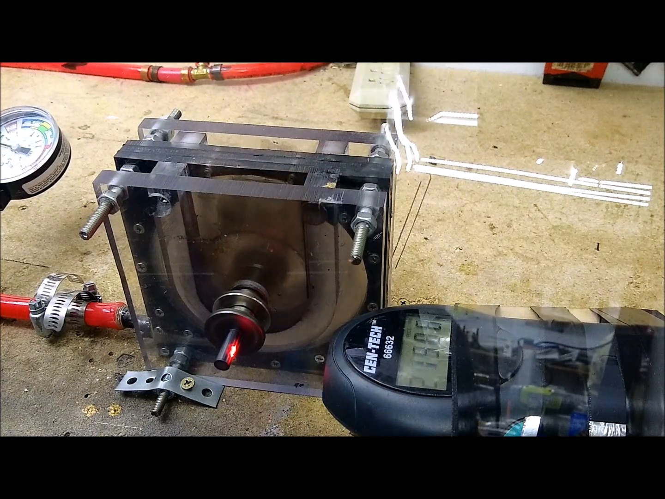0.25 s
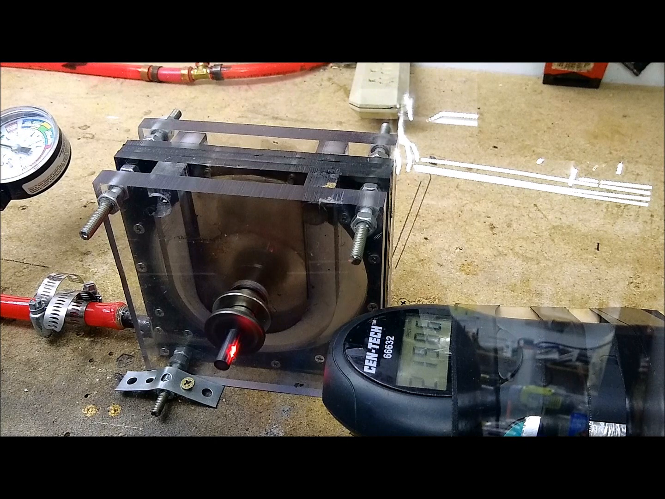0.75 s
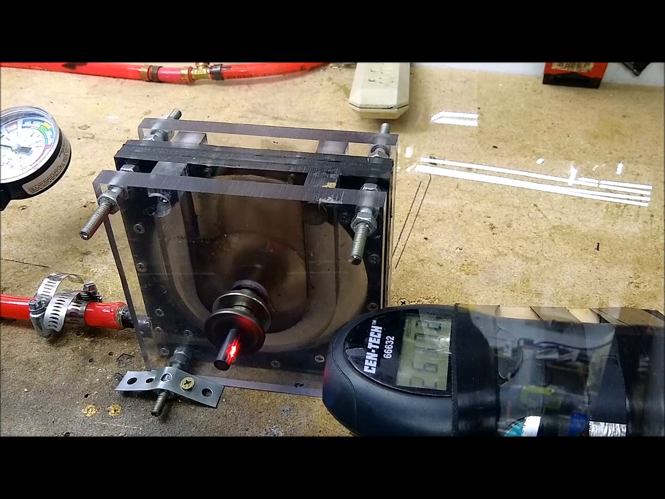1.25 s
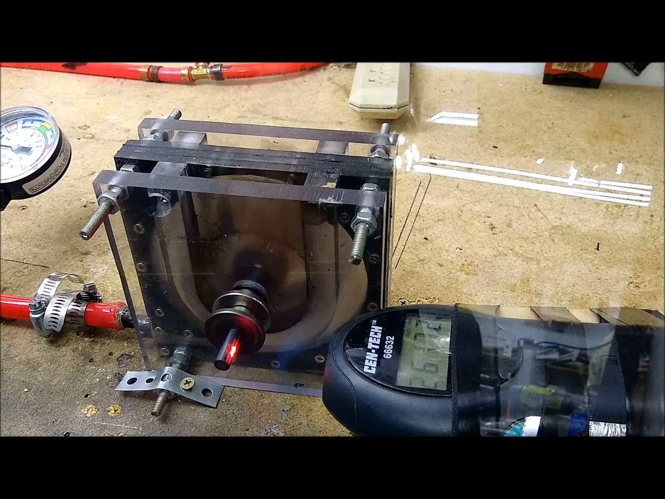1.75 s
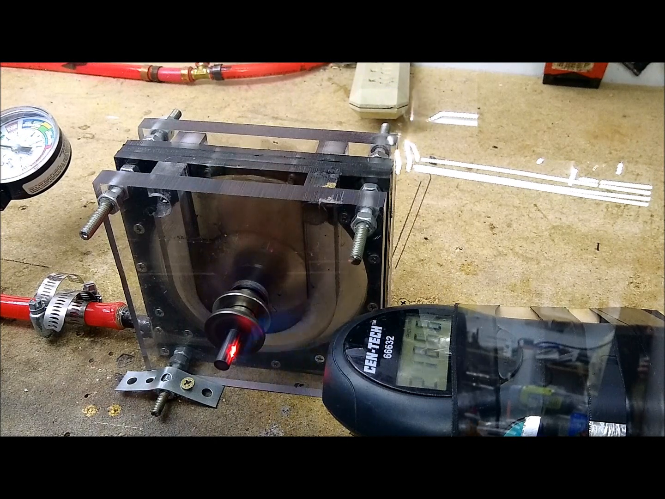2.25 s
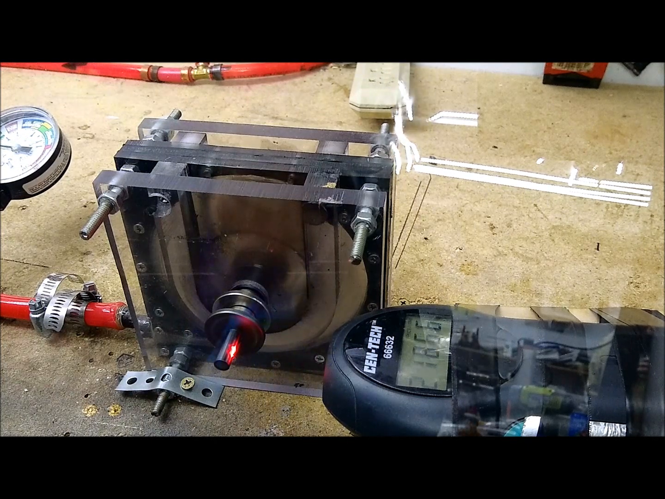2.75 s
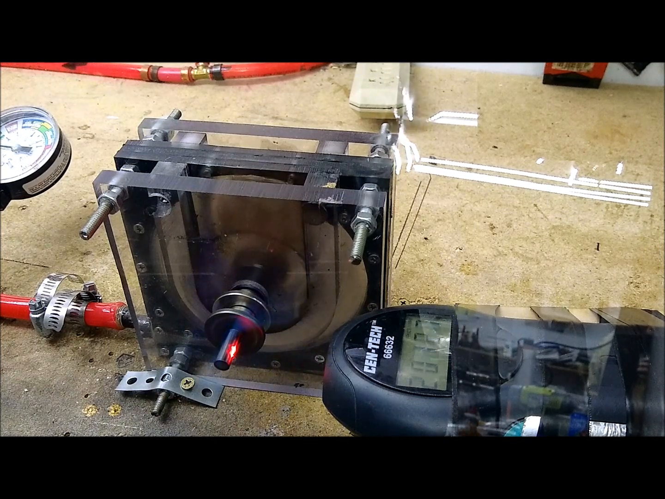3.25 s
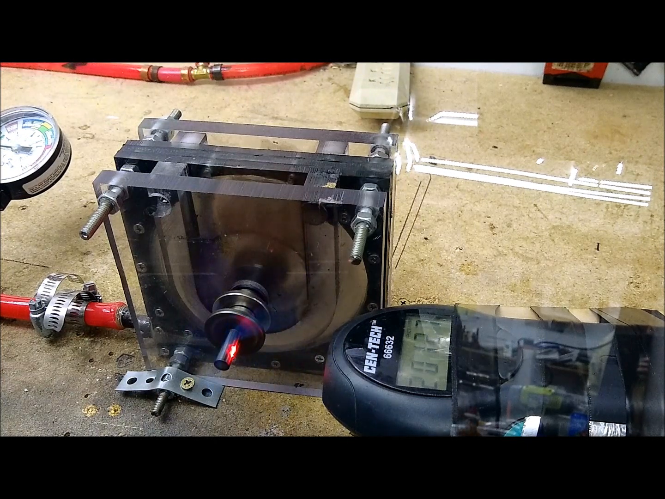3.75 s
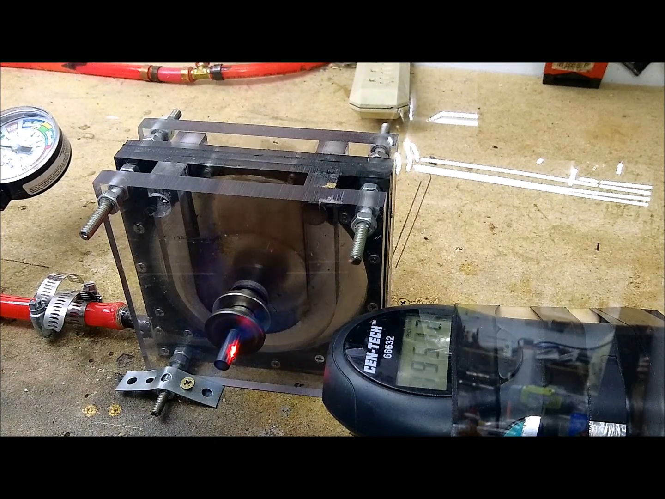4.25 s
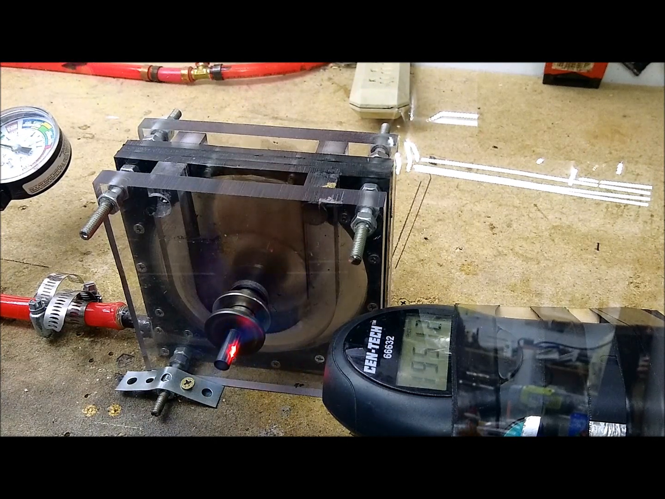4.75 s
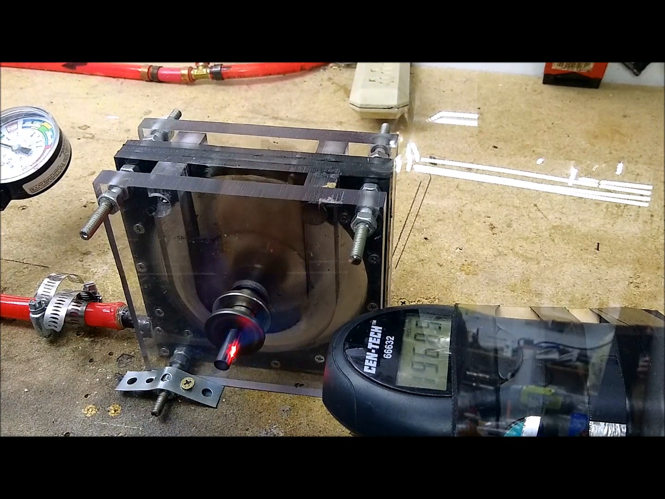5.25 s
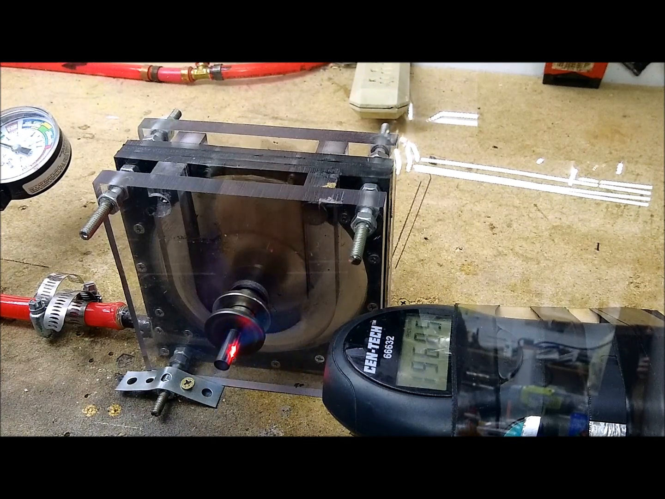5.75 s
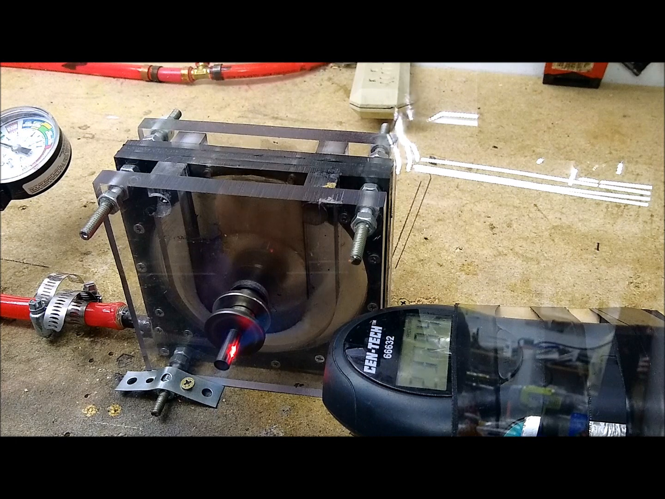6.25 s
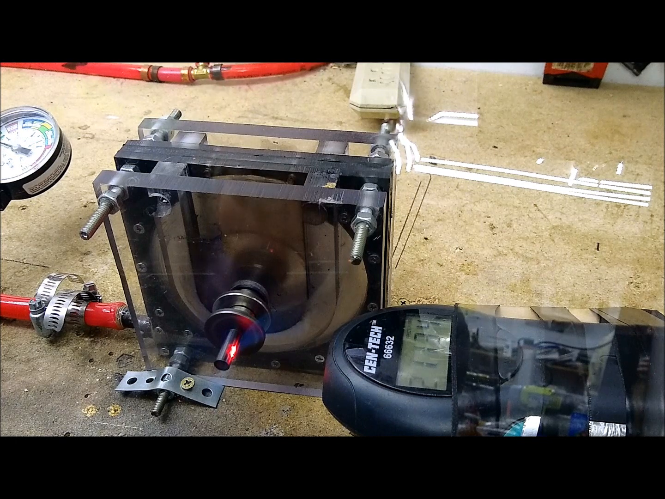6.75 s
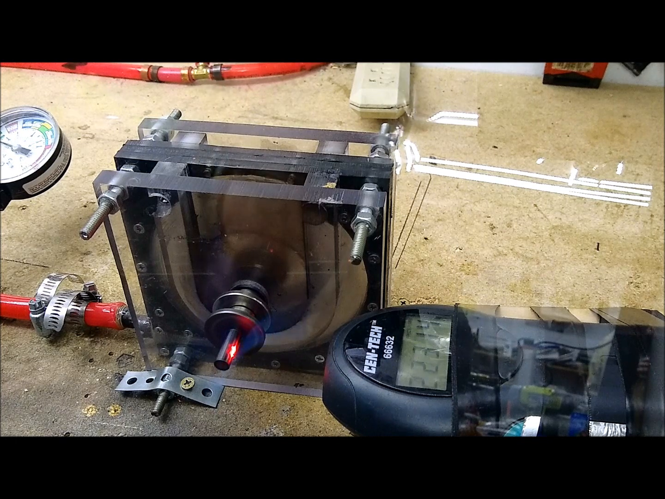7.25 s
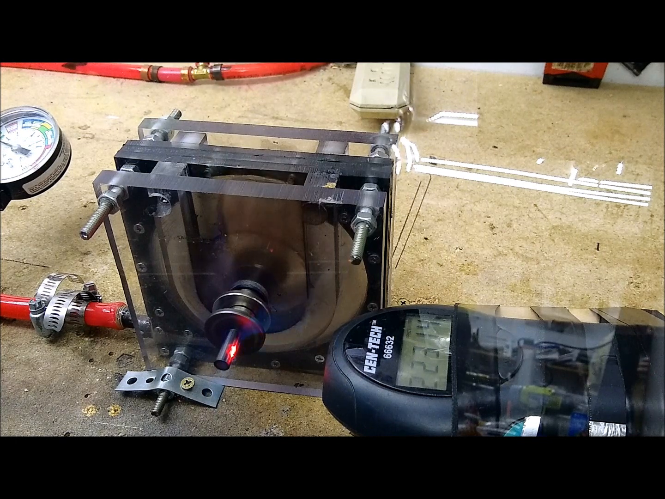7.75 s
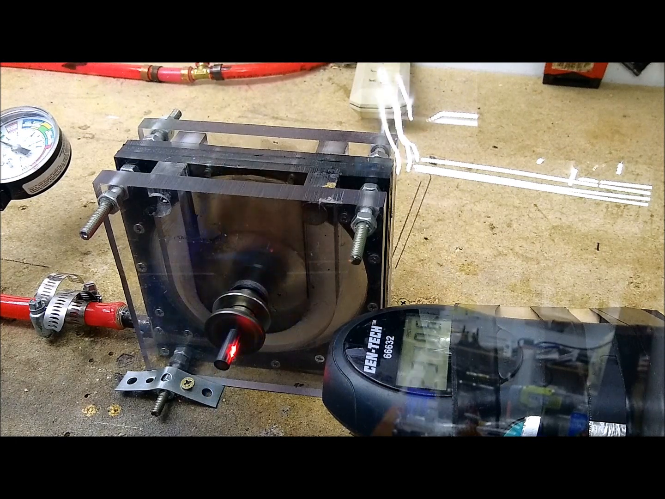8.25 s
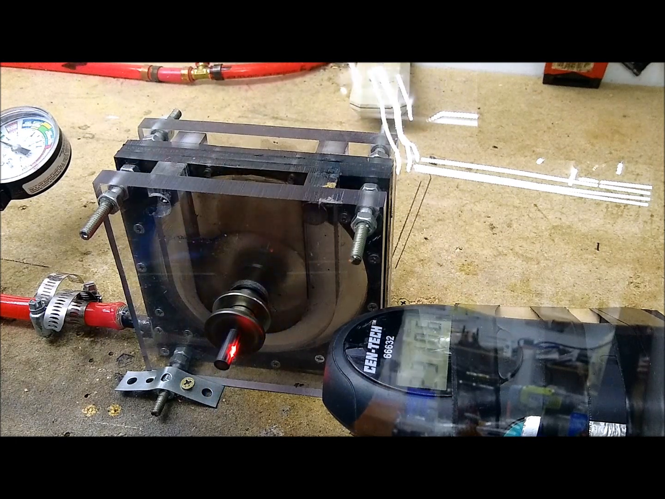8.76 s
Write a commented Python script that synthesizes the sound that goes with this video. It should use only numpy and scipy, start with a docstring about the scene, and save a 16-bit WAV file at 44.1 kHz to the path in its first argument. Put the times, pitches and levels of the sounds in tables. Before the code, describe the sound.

Close, piercing multi-toned whine of a small spinning turbine, jumping up, gliding down, then creeping higher, with jet hiss and hollow rushing behind it.

```python
"""A turbine whine shoots up to a peak, sags for about four seconds and slowly climbs again, close to two microphones.
A small air turbine on a workbench makes it: sines on the shaft orders, order 8 being its eight exhaust ports.
Standing waves are level tables over pitch: each tone swells, fades and wanders left and right.
Sparse echo taps smear the glides. Behind them lie casing roar and jet hiss, both of coloured, resonant noise."""
import sys
import numpy as np
from scipy import signal
from scipy.fft import rfft, irfft
from scipy.io import wavfile
from scipy.ndimage import uniform_filter1d

SR = 44100
rng = np.random.default_rng(int(sys.argv[2]) if len(sys.argv) > 2 else 0)


def dump_mix(stems):
    """Bounce the given channels to the path in sys.argv[1] as a 16-bit WAV at rate SR."""
    frames = np.atleast_2d(stems).T  # one column per channel
    limited = np.clip(frames, -1, 1)  # hard clip at full scale
    pcm = np.round(limited * 32767).astype(np.int16)
    wavfile.write(sys.argv[1], SR, pcm)


N = 397341

# Shaft speed, before smoothing: t/s, f/Hz
SHAFT_SPEED = [(0.0, 443.4), (0.04, 471.4), (0.08, 492.3), (0.12, 507.3), (0.16, 513.8), (0.2, 515.2),
               (0.24, 514.9), (0.52, 462.9), (0.72, 436.1), (0.96, 412.8), (1.1, 401.7), (1.5, 376.4),
               (1.8, 361.7), (2.2, 347.1), (2.7, 335.9), (3.3, 327.7), (4.4, 322.0), (4.8, 326.7),
               (5.9, 356.2), (6.4, 366.8), (7.1, 376.5), (7.5, 379.2), (7.8, 385.7), (8.2, 391.6),
               (8.8, 396.8), (9.0, 397.7)]
# Bearing sidebands and high orders: multiples of the shaft speed
FAINT_ORDERS = [1.085, 1.915, 2.085, 2.83, 2.915, 3.085, 3.915, 4.09, 9, 10, 11, 12]
# Their levels, in the same order: level/dB rms
FAINT_LEVELS = [-49.5, -52, -48.5, -55.5, -50, -49.5, -50.5, -51, -54, -57, -55.5, -64]
# Standing waves set how loud a tone arrives at each pitch, the same on the way down as on the way up.
# Around order 1: f/Hz, left level/dB rms, right level/dB rms, left lead/rad
STANDING_1 = [(322.0, -24.0, -28.0, -0.2), (325.3, -26.0, -31.5, 0.2), (327.3, -30.5, -40.5, 2.4),
              (331.8, -25.5, -30.5, 5.0), (335.9, -29.0, -37.0, 4.1), (338.7, -47.5, -33.5, 2.4),
              (339.6, -40.5, -31.0, 0.5), (341.0, -33.0, -31.5, 0.2), (355.0, -36.0, -26.0, 4.9),
              (358.0, -26.5, -24.0, 5.6), (362.0, -25.0, -25.5, 6.4), (366.0, -28.5, -45.5, 5.6),
              (367.0, -29.0, -33.0, 4.1), (371.2, -23.5, -21.5, 5.4), (376.0, -17.0, -19.0, 5.6),
              (380.0, -22.0, -21.0, 5.6), (391.0, -23.0, -23.5, 6.3), (393.9, -27.0, -32.5, 6.2),
              (397.0, -33.0, -32.5, 6.1), (398.0, -28.0, -29.0, 6.4), (403.5, -22.5, -26.0, 6.4),
              (410.5, -24.0, -28.5, 6.8), (417.5, -29.5, -47.5, 6.1), (421.0, -26.5, -35.5, 5.5),
              (428.0, -36.0, -35.5, 5.7), (445.5, -26.0, -23.5, 6.2), (491.0, -20.5, -28.5, 6.2),
              (505.0, -23.5, -25.5, 6.6), (512.0, -32.0, -46.0, 6.9), (515.2, -31.5, -36.0, 5.2)]
# Around order 2: f/Hz, left level/dB rms, right level/dB rms, left lead/rad
STANDING_2 = [(644, -30.0, -32.0, -0.8), (651, -28.5, -24.0, -0.7), (655, -28.5, -31.5, -1.0),
              (657, -42.5, -35.5, -1.8), (658, -43.0, -29.5, -0.3), (663, -32.0, -25.0, -0.9),
              (666, -32.0, -30.5, -2.1), (674, -28.5, -22.0, -5.0), (676, -30.0, -26.0, -5.0),
              (682, -23.5, -26.0, -5.4), (688, -26.5, -27.0, -5.7), (692, -27.5, -38.0, -6.0),
              (696, -24.0, -23.5, -6.5), (703, -18.5, -16.5, -6.2), (714, -24.5, -23.5, -5.9),
              (718, -21.0, -23.0, -5.9), (732, -26.5, -26.0, -6.2), (736, -28.5, -30.0, -5.9),
              (743, -21.5, -21.0, -5.7), (749, -28.5, -28.5, -5.6), (754, -22.5, -25.0, -5.6),
              (768, -26.5, -31.5, -6.1), (777, -18.0, -20.5, -6.4), (788, -22.5, -25.0, -6.2),
              (835, -17.0, -20.5, -6.5), (842, -18.0, -21.0, -6.5), (856, -24.0, -31.0, -7.1),
              (863, -21.5, -18.5, -7.0), (870, -19.0, -18.0, -6.8), (884, -25.0, -27.0, -6.8),
              (898, -29.5, -23.0, -6.9), (905, -34.0, -27.5, -6.3), (919, -20.5, -21.0, -6.3),
              (961, -47.0, -43.5, -5.0), (975, -38.5, -38.0, -5.7), (1030, -39.5, -38.0, -6.1)]
# Around order 3: f/Hz, level/dB rms
STANDING_3 = [(966, -33), (970, -25.5), (972, -27), (976, -24), (988, -39.5), (994, -31), (1013, -39),
              (1015, -34), (1056, -44), (1084, -36.5), (1119, -44.5), (1122, -40), (1274, -25), (1284, -31),
              (1316, -26.5), (1366, -40), (1378, -34.5), (1389, -45), (1420, -39.5), (1452, -56),
              (1484, -31), (1545, -40)]
# Around order 4: f/Hz, level/dB rms
STANDING_4 = [(1288, -33), (1375, -40), (1383, -36), (1404, -46), (1464, -36), (1477, -58), (1496, -37.5),
              (1511, -45), (1614, -38.5), (1670, -49), (1821, -42), (1838, -53), (1973, -51), (2060, -50)]
# Around order 8, the port whine: f/Hz, level/dB rms
STANDING_8 = [(2576, -35), (2608, -38.5), (2618, -52.5), (2623, -36.5), (2657, -31.5), (2669, -37.5),
              (2692, -29), (2700, -37), (2715, -38), (2768, -29.5), (2777, -31), (2805, -33), (2842, -31),
              (2880, -27.5), (2904, -35.5), (2920, -30.5), (2938, -27), (2958, -27), (2960, -35.0),
              (2968, -30), (2992, -34.5), (3000, -36.5), (3016, -34.5), (3023, -47), (3040, -28.5),
              (3057, -39.5), (3066, -26.0), (3109, -30.5), (3128, -39.5), (3144, -30.5), (3151, -29.5),
              (3168, -22), (3192, -36.5), (3340, -26), (3368, -29.5), (3396, -35), (3424, -21), (3480, -32),
              (3508, -24.5), (3564, -24.5), (3592, -41), (3620, -26), (3844, -27.5), (3872, -55),
              (3928, -25), (3956, -49.5), (3984, -33), (4012, -34.5), (4096, -33.5), (4122, -30.5)]
# Level trim: shaft orders weaken while the rotor gains speed.
# t/s, order 1 level/dB, order 2 level/dB, order 3 level/dB, order 4 level/dB
DRIVEN_TRIM = [(0.0, -5, -13, -14, -12), (0.22, -3, 5.5, -4, -7), (0.32, 0, 0, -1.5, 2.5),
               (4.4, 1, -1, -1.5, -0.5), (4.9, -0.5, -2.5, -5, -4), (5.6, 1.5, -10.5, 2.5, -4),
               (7.0, 0, -12.5, 2, -4.5), (9.0, 0, -13.5, -1, -4.5)]
# Broad level of weak order 5, before its slow swell: f/Hz, level/dB rms
WEAK_5 = [(1610, -42.0), (1687, -48.5), (2000, -51), (2175, -33), (2368, -53.5), (2576, -55.0)]
# Weak order 6, likewise: f/Hz, level/dB rms
WEAK_6 = [(1933, -53.0), (2396, -53), (2464, -40), (2904, -51), (3091, -41)]
# Weak order 7, likewise: f/Hz, level/dB rms
WEAK_7 = [(2255, -66.5), (2781, -51.5), (3118, -36.5), (3314, -48), (3606, -45)]
# Weak order 16, likewise: f/Hz, level/dB rms
WEAK_16 = [(5154, -47), (5360, -54), (5581, -56), (5890, -51), (5968, -45), (6218, -45), (6274, -41.5),
           (6309, -52), (6330, -46), (6800, -45), (7200, -50), (7600, -44), (8000, -50), (8242, -52)]
# Weak order 24, likewise: f/Hz, level/dB rms
WEAK_24 = [(7730, -59), (8700, -60), (9053, -56), (9768, -60), (10300, -52), (11000, -44), (11600, -47),
           (12362, -46)]
# Companion tone throbbing against order 2, before its slow swell: f/Hz, level/dB rms
COMPANION = [(678, -43), (710, -42), (740, -58), (756, -44.5), (782, -42), (785, -52), (811, -37.5),
             (816, -47.5), (882, -51), (910, -38), (946, -38), (1064, -56)]
# Air flow, driving both hiss and roar: t/s, level/dB
AIR_FLOW = [(0.0, -43), (0.22, -46), (0.5, -42.5), (1.1, -43), (2.6, -41), (3.2, -42), (4.7, -41),
            (5.1, -43), (5.9, -43), (6.1, -41), (7.0, -43), (9.0, -43)]
# Colour of the casing roar: f/Hz, relative level/dB per Hz
ROAR_COLOUR = [(25, -52), (78, -26), (110, -73), (130, -13.5), (250, -19.5), (340, -5.5), (480, -10),
               (620, -3), (900, -6.5), (1250, -9), (1750, -4.5), (3200, -12), (4300, -13), (5300, -36.5)]
# Casing resonances: f/Hz, width/Hz, relative level/dB
CASING_MODES = [(551.5, 47, -1), (607, 48, 0.5), (681, 45, -4), (2337, 23.5, 8.5), (2660, 310, -6),
                (3020, 245, -2)]
# Colour of the jet hiss: f/Hz, relative level/dB per Hz
HISS_COLOUR = [(3500, -28), (4900, 6), (5350, -1), (6700, 0.5), (7800, -5.5), (8600, -2), (9400, -4.5),
               (10000, -3), (11000, -0.5), (12600, 0), (13100, -5), (14700, 1.5), (15200, -10),
               (15500, -16)]
# Nozzle resonances: f/Hz, width/Hz, relative level/dB
NOZZLE_MODES = [(4806, 120, 4.5), (5640, 66, 6.5), (6090, 330, 5), (7180, 74, 6), (8340, 130, -3.5),
                (8890, 170, 0), (9930, 270, 0), (10850, 150, 5), (12800, 100, -5), (14800, 260, -8)]
# Between the microphones, sound reinforces and cancels by turns: f/Hz, left-right likeness (-1 to 1)
LIKENESS = [(60, .3), (160, .65), (380, .7), (520, .4), (950, .97), (1250, .98), (1700, -.1), (2080, -.97),
            (2300, -.98), (2700, .1), (3250, .97), (3650, .9), (4150, -1), (4650, -1), (5450, .7),
            (6200, .42)]
# Stereo balance: f/Hz, left minus right level/dB
BALANCE = [(25, 2), (120, 3.5), (400, .8), (2200, 0), (3000, 1.5), (4400, 0), (5700, 3), (7000, 5),
           (9000, 8), (11500, 6.5), (14000, 2.5), (15500, 0)]

EARLY = SR // 2  # samples the turbine already turns before time zero
STEP = 64  # samples between level updates
BUILD_S, BUILD_1_S, BUILD_8_S = 0.036, 0.015, 0.002  # lag behind a pitch change: most tones, order 1, order 8
WEAK_ORDERS_WANDER_DB, PORTS_WANDER_DB = 1.5, 3.5  # slow swell; left-right wander of the port whine
COMPANION_HZ = 32.89  # distance above order 2
ORDER_32_DB = -63  # dB rms
LEAD_FROM_HZ, LEAD_S = 5370, 0.000406  # in the treble the jet reaches the left microphone first
MIDDLE_HZ = 370  # shaft speed at which the roar takes no boost or cut from speed
EDGE_HZ = 15490  # top of the band


def order_levels(now, slow_hz):
    """Standing waves: each order's level follows its pitch, a little late. Returns lines, stereo and port pan."""
    def delayed(lag_s):
        return np.interp(now - lag_s, now, slow_hz)

    late_hz = delayed(BUILD_S)
    sided = {1: follow(STANDING_1, delayed(BUILD_1_S)), 2: follow(STANDING_2, 2 * late_hz)}
    level_db = {}
    for k, (left_db, right_db, _) in sided.items():
        mean_power = (gain_of(left_db) ** 2 + gain_of(right_db) ** 2) / 2
        level_db[k] = 10 * np.log10(mean_power)

    weak = {5: WEAK_5, 6: WEAK_6, 7: WEAK_7, 16: WEAK_16, 24: WEAK_24}
    for k, table in {3: STANDING_3, 4: STANDING_4, **weak}.items():
        level_db[k] = follow(table, k * late_hz)[0]
    for k, trim_db in enumerate(follow(DRIVEN_TRIM, now), 1):
        level_db[k] = level_db[k] + trim_db

    *weak_wander, companion_wander, ports_pan = drift(count=7, rate=3)
    for k, wander in zip(weak, weak_wander):
        level_db[k] = level_db[k] + WEAK_ORDERS_WANDER_DB * wander
    level_db[8] = follow(STANDING_8, 8 * delayed(BUILD_8_S))[0]
    level_db[32] = ORDER_32_DB
    level_db.update(zip(FAINT_ORDERS, FAINT_LEVELS))

    companion_db = follow(COMPANION, 2 * late_hz + COMPANION_HZ)[0]
    companion_db = companion_db + WEAK_ORDERS_WANDER_DB * companion_wander
    lines = [(k, 0, db) for k, db in level_db.items()]
    lines.append((2, COMPANION_HZ, companion_db))
    return lines, sided, ports_pan


def turbine_tones(hz, t):
    """Flickering sines on multiples of the shaft speed; returns direct sound and the feed to the room."""
    now, slow_hz = t[::STEP], hz[::STEP]
    lines, sided, ports_pan = order_levels(now, slow_hz)
    glide = abs(uniform_filter1d(np.gradient(hz) * SR, size=SR // 2))[::STEP]  # Hz per second
    flutter = drift(count=len(lines), rate=14)
    turns = np.cumsum(hz) / SR
    direct, feed = np.zeros((2, len(t))), np.zeros(len(t))

    for (k, above_hz, db), shake in zip(lines, flutter):
        pan_db, same = read(BALANCE, k * slow_hz), read(LIKENESS, k * slow_hz)
        # direct sound is more alike left and right than the noise
        apart = lead(k * slow_hz) - np.arccos(same + 0.3 * (1 - same ** 2))
        if k in sided and not above_hz:
            left_db, right_db, apart = sided[k]
            pan_db = left_db - right_db
        if k == 8:
            pan_db = pan_db + PORTS_WANDER_DB * ports_pan

        flicker_db = 1.16 * np.log(1 + k) * shake  # high tones flicker more
        size = np.sqrt(2) * gain_of(db + flicker_db)  # rms to peak
        left_share = 1 / (1 + gain_of(-pan_db) ** 2)
        # a fast glide beats against its echoes, less so up high
        sweep = (k ** 2 * glide / 3000) ** 2
        echoed = 0.015 + 0.6 * sweep / (1 + sweep) / (1 + (k / 20) ** 2)

        left_size = size * np.sqrt(2 * left_share * (1 - echoed))
        right_size = size * np.sqrt(2 * (1 - left_share) * (1 - echoed))
        wet_size = size * np.sqrt(echoed)
        controls = left_size, right_size, wet_size, apart / 2
        left, right, wet, half = [np.interp(t, now, v) for v in controls]
        phase = 2 * np.pi * (k * turns + above_hz * t + rng.random())
        direct[0] += left * np.sin(phase + half)
        direct[1] += right * np.sin(phase - half)
        feed += wet * np.sin(phase)
    return direct, feed


def workshop_echo(x, t60):
    """Sparse taps of random sign, one in every 20 samples, dying away; each glide leaves a smear behind."""
    taps = np.zeros((2, EARLY))
    slots = np.arange(300, EARLY - 20, 20)
    at = slots + rng.integers(0, 20, (2, len(slots)))
    np.put_along_axis(taps, at, rng.choice([-1., 1.], at.shape), 1)
    taps *= gain_of(-60 * np.arange(EARLY) / SR / t60)

    hz = np.fft.rfftfreq(EARLY, 1 / SR)
    same = np.clip(read(LIKENESS, hz), -1, 1)  # the echoes meet the same pair of microphones
    shared, separate = rfft(taps / np.linalg.norm(taps[0]))
    side = gain_of(read(BALANCE, hz) / 2)
    other = same * shared + np.sqrt(1 - same ** 2) * separate
    taps = irfft([shared * side, other / side], EARLY)
    return signal.fftconvolve(x[None], taps, axes=1)[:, :len(x)]


def casing_roar(air_db, pace):
    """Faster discs churn the air harder and ring the casing."""
    level_db = -33 + 0.65 * (air_db + 43.5) + 5 * pace
    return airy(ROAR_COLOUR, CASING_MODES, level_db, modes_db=9 * pace, patchy_db=2.04, ripple_db=0.44)


def jet_hiss(air_db):
    """The air jet: treble noise with steady nozzle resonances, its level riding the air flow."""
    steady_db = np.zeros_like(air_db)
    return airy(HISS_COLOUR, NOZZLE_MODES, air_db + 5.0, modes_db=steady_db, patchy_db=1.3, ripple_db=0.91)


def airy(spectrum, modes, level_db, modes_db, patchy_db, ripple_db):
    """Stereo noise of a given colour with resonances, faint patches and the fine ripple of nearby reflections."""
    frames, hz = N // 512 + 5, np.fft.rfftfreq(2048, 1 / SR)
    a, b, c, d, patches = rng.standard_normal((frames, 1025, 5)).T
    ripple = evened(uniform_filter1d(rng.standard_normal((1025, 1)), size=3, axis=0))
    patches = uniform_filter1d(patches, size=16, axis=0)  # across frequency
    patches = evened(uniform_filter1d(patches, size=6, axis=1))  # across time

    ringing = sum(gain_of(db) ** 2 / (1 + (2 * (hz - f) / w) ** 2) ** 2 for f, w, db in modes)
    frame_at = np.minimum(np.arange(frames) * 512, N - 1)
    ringing = np.outer(ringing, gain_of(modes_db[frame_at]) ** 2)
    power = gain_of(read(spectrum, hz))[:, None] ** 2 + ringing

    same = np.clip(read(LIKENESS, hz), -1, 1)[:, None]
    shared, separate = a + 1j * b, c + 1j * d
    other = same * shared + np.sqrt(1 - same ** 2) * separate
    side = gain_of(read(BALANCE, hz) / 2)[:, None]
    z = np.array([shared * np.exp(1j * lead(hz))[:, None] * side, other / side])
    z *= np.sqrt(power) * gain_of(patchy_db * patches + ripple_db * ripple)
    noise = signal.istft(z, nperseg=2048, noverlap=1536)[1][:, :N]
    return evened(noise) * gain_of(level_db)


def lead(hz):
    """Phase by which the left microphone leads in the treble: a fixed delay above a corner."""
    return 2 * np.pi * LEAD_S * np.maximum(hz - LEAD_FROM_HZ, 0)


def drift(count, rate):
    """Random wander of rms 1, one row each, joining `rate` random points a second."""
    points = rng.standard_normal((count, 400))
    at = np.arange(0, N + EARLY, STEP) * rate / SR
    return [evened(np.interp(at, np.arange(400), row)) for row in points]


def follow(rows, x):
    """Every column of a table at the times or pitches x."""
    key, *columns = np.transpose(rows)
    return [np.interp(x, key, column) for column in columns]


def read(points, hz):
    """Reads a spectrum on a log-frequency axis."""
    f, value = np.transpose(points)
    return np.interp(np.log(hz + 1), np.log(f + 1), value)


def gain_of(db):
    """Decibels to an amplitude factor."""
    return 10 ** (np.asarray(db) / 20)


def evened(x):
    """Scales to rms 1."""
    return x / np.sqrt(np.mean(x ** 2) + 1e-20)


def scene():
    """Tones with their echo, then roar and hiss behind them."""
    t = np.arange(-EARLY, N) / SR
    racing_up = 650 * np.minimum(t, 0)  # before time zero the shaft gains 650 Hz per second
    hz = uniform_filter1d(follow(SHAFT_SPEED, t)[0] + racing_up, size=SR // 24)
    direct, feed = turbine_tones(hz, t)
    whine = (direct + workshop_echo(feed, t60=0.57))[:, EARLY:]
    air_db = follow(AIR_FLOW, t[EARLY:])[0]
    pace = np.log(hz[EARLY:] / MIDDLE_HZ)
    return whine + casing_roar(air_db, pace) + jet_hiss(air_db)


def record(dry):
    """The band limit: a steep linear-phase low-pass."""
    lowpass = signal.firwin(1535, EDGE_HZ, window=("kaiser", 9), fs=SR)
    return signal.oaconvolve(dry, lowpass[None], "same")


dry = scene()
out = record(dry)
dump_mix(out)
```